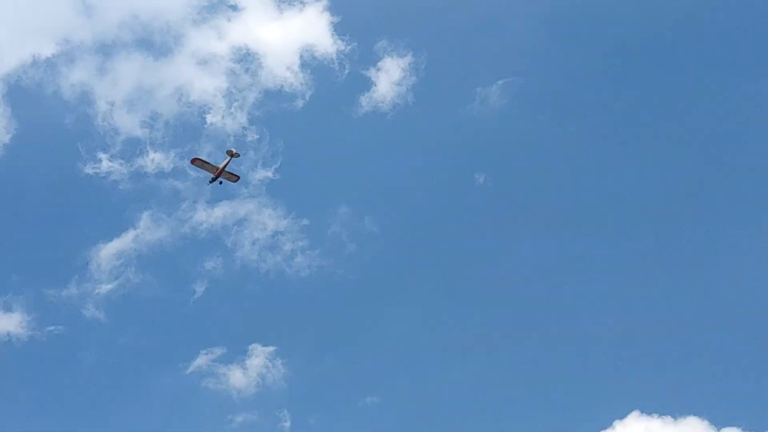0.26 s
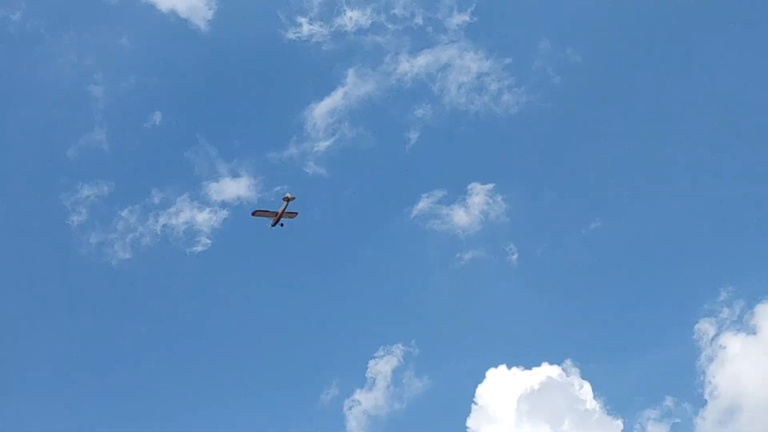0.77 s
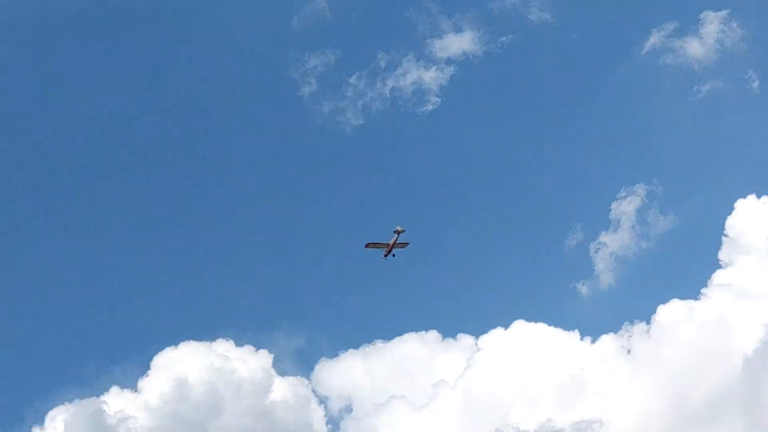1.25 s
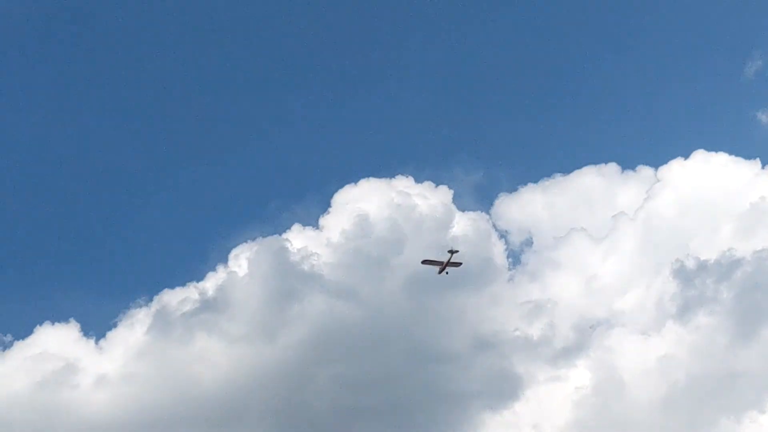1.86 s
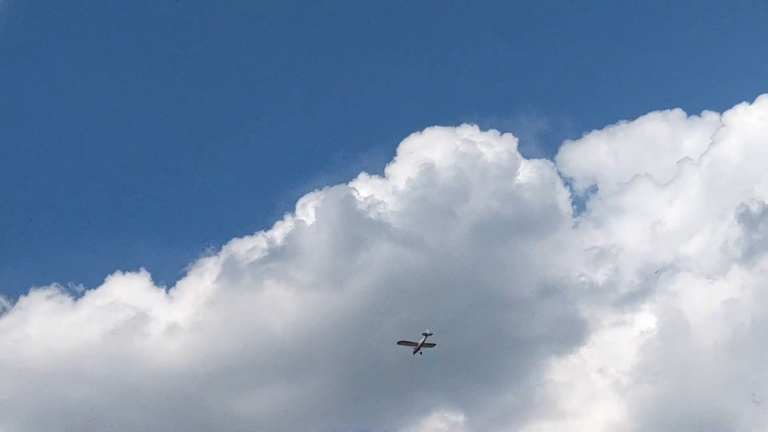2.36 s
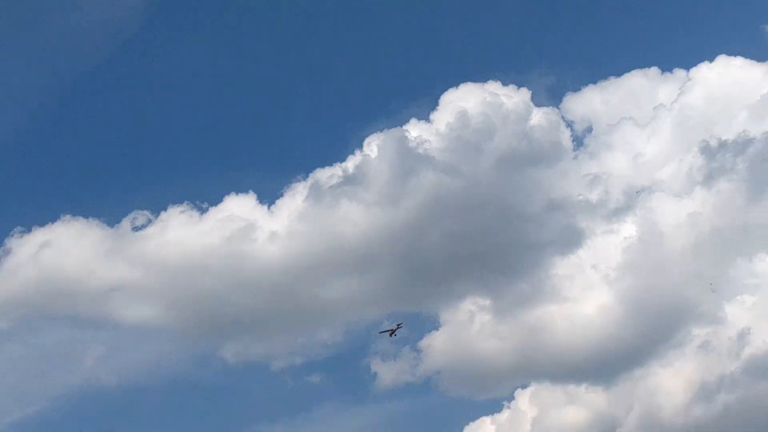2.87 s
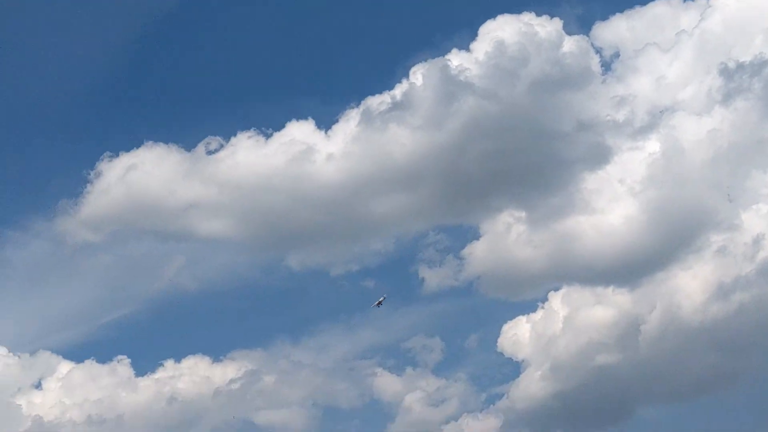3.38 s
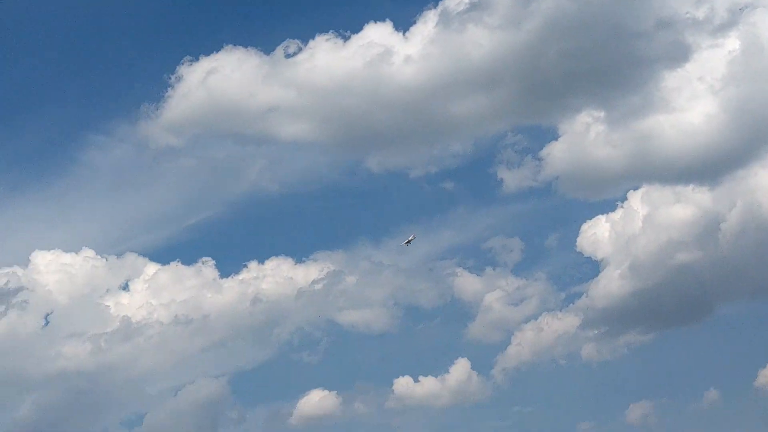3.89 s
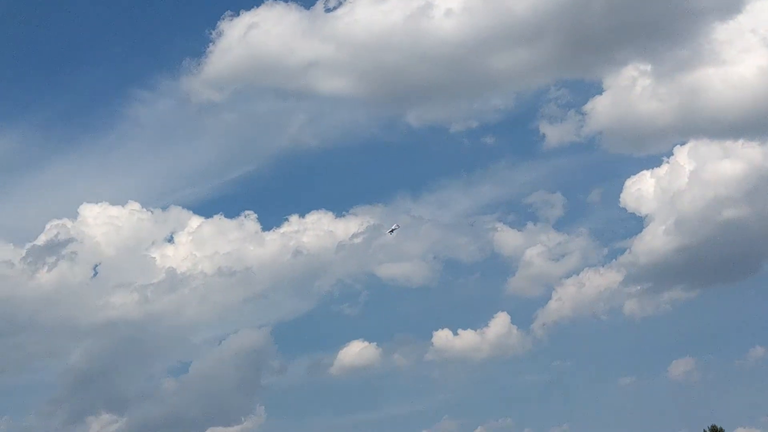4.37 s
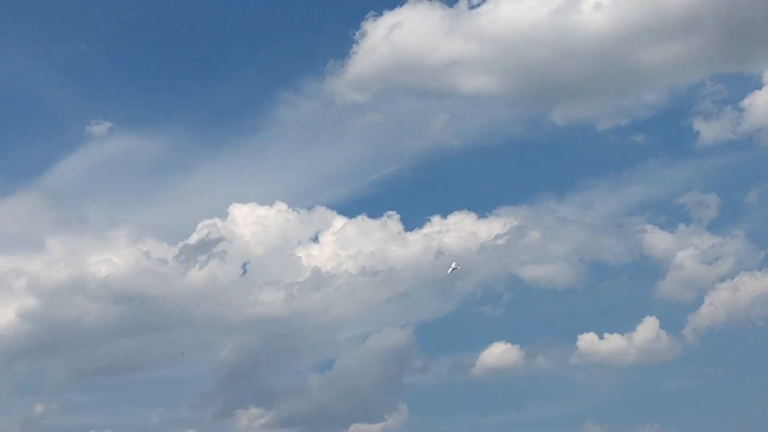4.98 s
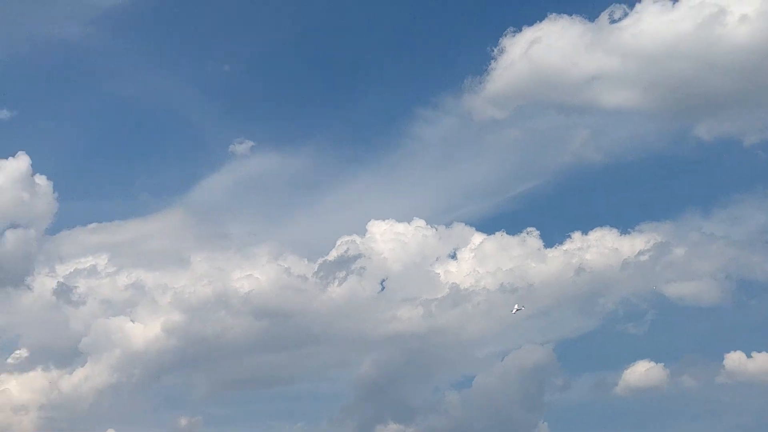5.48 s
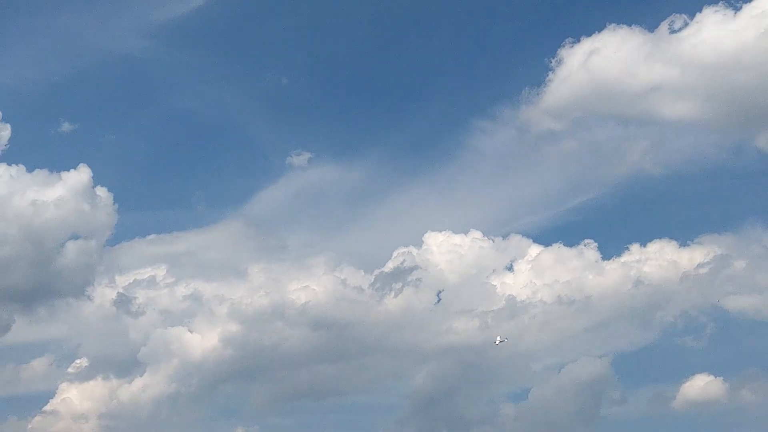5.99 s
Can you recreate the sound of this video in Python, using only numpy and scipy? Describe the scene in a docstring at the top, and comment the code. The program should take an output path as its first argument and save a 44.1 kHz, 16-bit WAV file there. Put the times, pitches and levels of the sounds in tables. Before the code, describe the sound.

The raspy, uneven buzz of a model plane's engine recedes and then speeds up, amid wind gusts and light handling knocks.

```python
"""A small two-stroke model aeroplane idles past overhead, firing once every one to five turns of the shaft,
then opens up as it turns away. Each pop rings the exhaust pipe and silencer and comes again off the ground,
over the propeller's whine and rush. Gusts buffet and thump the hand-held microphone; fingers rustle, tick and
knock on it. Behind, the open air murmurs, a far machine hums, a thin hiss swells and a whistle falls."""
import sys
import numpy as np
from scipy import signal
from scipy.io import wavfile
from scipy.ndimage import uniform_filter1d

SR = 44100
rng = np.random.default_rng(int(sys.argv[2]) if len(sys.argv) > 2 else 0)


def dump(signal):
    """Clip the signal to [-1, 1] and save it as 16-bit WAV at the path in sys.argv[1]."""
    limited = np.clip(np.atleast_2d(signal).T, -1, 1)
    pcm = np.round(limited * 32767).astype(np.int16)
    wavfile.write(sys.argv[1], SR, pcm)


N = 275169
TIME = np.arange(N) / SR

# The engine shaft's progress. Each row: time in seconds, turns made so far.
SHAFT = [(-0.0047, 0), (.2862, 21), (.5132, 37), (.6725, 48), (.8859, 63), (1.1864, 84), (1.4546, 103),
         (1.6857, 119), (1.8703, 132), (2.0571, 145), (2.1882, 154), (2.404, 169), (2.682, 188),
         (2.8528, 200), (2.9548, 207), (3.0877, 216), (3.31, 231), (3.5442, 247), (3.6346, 253),
         (3.7213, 259), (4.0177, 280), (4.1042, 286), (4.2667, 297), (4.4517, 310), (4.6022, 321),
         (4.6808, 327), (4.7562, 333), (4.8527, 341), (4.9233, 347), (5.038, 357), (5.1726, 369),
         (5.3032, 381), (5.4339, 393), (5.541, 403), (5.6695, 415), (5.7945, 427), (5.8777, 435),
         (6.2393, 470)]


def undb(db):
    """Decibels to gain."""
    return 10 ** (np.asarray(db) / 20)


def level(x, db):
    """Scale to an rms level."""
    return x * undb(db) / np.sqrt(np.mean(x ** 2))


def curves(table):
    """Columns of a timed table as curves, sample by sample."""
    s, *columns = np.transpose(table)
    return [np.interp(TIME, s, c) for c in columns]


def butter(order, hz, kind="low"):
    """Sections of a Butterworth filter."""
    return signal.butter(order, hz, kind, fs=SR, output="sos")


def band(x, hz, width_hz):
    """Resonance with gain 1 at the centre."""
    return signal.lfilter(*signal.iirpeak(hz, hz / width_hz, fs=SR), x)


def body(x, modes, flip=False):
    """Steep resonances (Hz, width in Hz, dB); flipping every other one leaves no hole between them."""
    return sum((-1) ** (k * flip) * undb(db) * band(band(x, hz, width), hz, width)
               for k, (hz, width, db) in enumerate(modes))


def clicks(s, size):
    """Impulses, each shared between two samples."""
    out, place = np.zeros(N + 1), np.asarray(s) * SR
    inside = (place >= 0) & (place < N - 1)
    whole, size = place[inside].astype(int), size[inside]
    np.add.at(out, whole, size * (whole + 1 - place[inside]))
    np.add.at(out, whole + 1, size * (place[inside] - whole))
    return out[:N]


def delay(x, ms):
    """Delay by a steady or moving time."""
    return np.interp(np.arange(N) - ms * SR / 1000, np.arange(N), x, left=0)


def fade(x, ms):
    """Every impulse becomes a decaying envelope."""
    return signal.lfilter([1], [1, -np.exp(-1000 / (ms * SR))], x)


def walk(rate):
    """Random levels held 1 / rate seconds and smoothed twice."""
    k = int(SR / rate)
    held = np.repeat(rng.standard_normal(N // k + 1), k)
    return 2.16 * uniform_filter1d(uniform_filter1d(held, k), k)[:N]


def swell(s, length_s):
    """Bell-shaped envelope that peaks at s."""
    return np.exp(-(2 * (TIME - s) / length_s) ** 2)


def open_air():
    """Outdoor murmur: half-octave bands of noise, each wavering on its own."""
    # The murmur's colour. Each row: frequency in Hz, relative level in dB.
    spectrum = [(60, -2), (100, -9), (160, -30), (250, -22), (400, -34.5), (1000, -5.5), (2000, 9),
                (3200, -42), (5000, -55.5), (8000, -71.5), (16000, -76.5)]
    hz, db = np.transpose(spectrum)
    air = 0
    for centre in 70 * 2 ** np.arange(0, 7, .5):
        mode = [(centre, centre / 2, 0)]
        band_db = np.interp(np.log(centre), np.log(hz), db) + walk(17)
        air = air + body(undb(band_db) * body(rng.standard_normal(N), mode), mode)
    return level(air, -52)


def far_machine(pitches_hz=(87.5, 117)):
    """A distant hum: two low tones that waver in level and pitch."""
    # The hum's course. Each row: time in seconds, lower tone in dB, upper tone in dB.
    levels = [(0, -56, -56), (2.5, -51, -55.5), (3.3, -46, -53), (3.7, -44, -59), (4.05, -40.5, -55.5),
              (4.4, -50, -58), (4.7, -52, -50), (5.1, -59, -56), (5.601, -50, -49.5), (6.24, -45, -53)]
    hum = 0
    for hz, db in zip(pitches_hz, curves(levels)):
        gain = np.sqrt(2) * undb(db + 1.2 * walk(7.3))
        pitch = hz * (1 + 0.0036 * walk(3.46))
        hum = hum + gain * np.sin(np.cumsum(2 * np.pi * pitch / SR))
    return hum


def treble_hiss():
    """A narrow hiss, unrelated left and right, swells and sinks."""
    # Swells of hiss. Each row: peak time in seconds, length in seconds, level in dB.
    swells = [(.9, 0.35, -70), (1.4, 0.45, -66.5), (3.5, .1, -61), (3.757, 0.07, -62), (3.93, 0.13, -66),
              (4.25, .25, -86), (4.78, .14, -82), (5.12, 0.22, -70.5)]
    # The hiss band: centre in Hz, width in Hz, gain in dB.
    tone = [(8230, 1400, 0)]
    gain = sum(undb(db) * swell(s, length_s) for s, length_s, db in swells)
    return gain * level(body(rng.standard_normal((2, N)), tone), 0)


def whistle():
    """One faint, falling, fluttering tone, perhaps a far bird."""
    # The glide. Each row: time in seconds, pitch in Hz, level in dB.
    glide = [(5.2, 3660, -95), (5.25, 3620, -70), (5.32, 3550, -63), (5.41, 3340, -77), (5.43, 3320, -95)]
    hz, db = curves(glide)
    gain = undb(db + 4 * walk(110))
    pitch = hz * (1 + .008 * walk(90))
    return gain * np.sin(np.cumsum(2 * np.pi * pitch / SR))


def wind(lulls_per_s=7.5):
    """Eddies at the microphone port: lumpy low noise, the same in both channels."""
    # The breeze between gusts. Each row: time in seconds, buffet and rumble in relative dB.
    breeze = [(0, -38, -57), (.45, -30.5, -34), (1.3, -22, -41), (1.5, -35.5, -59), (1.9, -33.5, -47),
              (2.3, -32.5, -41.5), (2.6, -33.5, -50.5), (3.5, -33, -51.5), (4.2, -36.5, -53.5),
              (4.7, -46.5, -60), (5.2, -50, -58), (5.7, -53.5, -56), (6.24, -34.5, -60)]
    # Gusts. Each row: peak time and length in seconds, buffet and rumble in relative dB.
    gusts = [(0, 0.052, -27, -38), (0.125, 0.11, -24, -39), (0.426, 0.083, -26, -49),
             (0.673, 0.05, -15.5, -43), (0.782, 0.099, -23.5, -59), (0.942, 0.095, -18.5, -39),
             (1.183, 0.13, -24, -47), (1.36, 0.07, -13.5, -37), (1.444, 0.17, -53, -36.5),
             (1.633, 0.099, -36, -38), (2.113, 0.37, -37.5, -49), (2.266, 0.045, -43, -51),
             (3.01, 0.076, -54, -47), (3.142, 0.045, -41, -57), (4.013, 0.016, -21.5, -54),
             (4.453, 0.32, -36.5, -49), (5.032, 0.14, -65, -43), (5.28, 0.16, -43, -54),
             (5.71, 0.022, -45, -55)]
    buffet_gain, rumble_gain = [undb(db + walk(lulls_per_s)) for db in curves(breeze)]
    for s, length_s, buffet_db, rumble_db in gusts:
        buffet_gain += undb(buffet_db) * swell(s, length_s)
        rumble_gain += undb(rumble_db) * swell(s, length_s)
    eddies = undb(0.97 * walk(50)) * rng.standard_normal(N)
    buffet = body(eddies, [(235, 78, 4), (268, 250, 7.5), (460, 240, -7)])
    buffet = signal.sosfilt(butter(5, [185, 1500], "band"), buffet)  # the wind filter cuts the lows
    slow_eddies = undb(0.18 * walk(4.5)) * rng.standard_normal(N)
    rumble = body(slow_eddies, [(75, 112, 28.5), (105, 97, -4)])
    return buffet_gain * level(buffet, -7) + rumble_gain * level(rumble, 0.13)


def strokes(table, touch_s=0.01, lift_ms=17):
    """Left and right gain of rubbing: touch, hold, lift."""
    held = np.zeros((2, N))
    for s, length_s, db, pan_db in table:
        held[:, int(s * SR):int((s + length_s) * SR)] += undb([[db + pan_db / 2], [db - pan_db / 2]])
    touched = uniform_filter1d(held, int(touch_s * SR))
    return fade(touched, lift_ms) * 1000 / (lift_ms * SR)


def rustle(grip_db=-77.5):
    """Skin rubs the casing in grainy strokes and rough scrapes; even the resting grip whispers."""
    # Light strokes. Each row: start and length in seconds, level in dB, left minus right in dB.
    rubs = [(0.588, 0.064, -62, -8), (0.698, 0.027, -58, 4), (.76, 0.14, -60, -4), (.92, 0.11, -62, -3),
            (1.06, 0.23, -66, -12), (1.298, 0.11, -58, 5), (1.45, 0.16, -64.5, 15),
            (1.628, 0.08, -57.5, -6), (1.735, 0.059, -61, -5), (3.33, 0.037, -65, -9),
            (3.455, 0.055, -61, -14), (3.72, 0.062, -65, -18), (3.997, 0.032, -52, 5),
            (4.519, 0.043, -72, 5), (5.52, .1, -86, -6)]
    # Their bright colour. Each row: centre in Hz, width in Hz, gain in dB.
    rub_tone = [(2980, 320, -16.5), (5050, 6500, -0.5), (8040, 1600, -0.5), (12000, 22000, -7)]
    # Scrapes along the grip. Each row: start and length in seconds, level in dB, left minus right in dB.
    scrapes = [(.6, 0.059, -47, 4), (1.5, 0.1, -48, 0), (3.44, 0.054, -54, -2), (4.0, 0.025, -38.5, 0)]
    # Their lower colour. Each row: centre in Hz, width in Hz, gain in dB.
    scrape_tone = [(2900, 1100, -3), (4300, 260, -18)]
    grain = undb(2 * walk(150) + walk(25))
    rub = level(body(grain * rng.standard_normal((2, N)), rub_tone), 0.44)
    scrape = level(body(grain * rng.standard_normal(N), scrape_tone), 0)
    return rub * (strokes(rubs) + undb(grip_db)) + scrape * strokes(scrapes)


def ticks():
    """Fingers tick on the casing: tiny bursts of bright noise."""
    # Lone ticks. Each row: time in seconds, relative peak in dB, left minus right in dB.
    touches = [(0.7051, -34, 22), (0.8014, -32, 7), (1.1187, -43, 18), (1.1683, -33, -12),
               (1.2842, -32, 11), (1.3406, -34, 17), (1.365, -34, 21), (1.667, -36.5, 37),
               (1.6824, -38, -0.5), (1.71, -35, -3), (1.748, -32, 3), (3.2027, -33, -10),
               (3.2452, -23.5, -2), (3.7, -47, 4), (3.816, -46, 0), (3.9841, -41, 7), (4.009, -38, 10),
               (4.029, -23, 9), (4.041, -25.5, 15), (4.5625, -34, 4), (4.9134, -30, 6), (5.2884, -43, 9),
               (6.125, -43, 15)]
    s, db, pan_db = np.transpose(touches)
    snaps = np.array([clicks(s + 0.00088, undb(db + side * pan_db / 2)) for side in (1, -1)])
    bursts = fade(snaps, ms=0.075) * rng.standard_normal((2, N))
    return undb(8) * body(bursts, [(7160, 5700, 0.023)])


def thumps_and_knocks():
    """Wind thumps and handling knocks on the microphone: short damped rings with a bright edge."""
    # Hits. Each row: time in seconds, relative peak in dB, pitch in Hz, ring time in ms, pressure sign.
    hits = [(0.1055, -9, 565, 37, 1), (0.676, -13, 390, 28, 1), (0.759, -10, 451, 69, 1),
            (0.943, -10, 324, 21, 1), (1.168, -11, 452, 7, 1), (1.313, -5.5, 553, 6.6, 1),
            (1.3422, -4.5, 645, 7.4, 1), (1.35, -8.5, 403, 27, -1), (1.3646, -0.5, 577, 16, 1),
            (1.385, -24, 360, 35, 1), (1.7115, 0, 600, 3.3, -1), (3.205, 0, 538, 5.5, 1),
            (3.2468, -10.5, 620, 1.4, 1), (3.985, -14, 634, 3.1, 1), (4.0288, -1.5, 855, 7.3, -1),
            (4.0298, -8, 594, 19, 1), (4.043, -11.5, 520, 4.6, -1), (4.435, -21, 346, 24, 1),
            (5.247, -46, 4420, 12, 1), (5.289, -42, 4100, 15, 1)]
    # The bright edge: centre in Hz, width in Hz, gain in dB.
    edge_tone = [(1900, 1210, 12.5)]
    rings, t = np.zeros(N), np.arange(SR // 20) / SR
    for s, db, hz, ms, sign in hits:
        ring = np.sin(2 * np.pi * hz * t) * np.exp(-np.log(1000) * t * 1000 / ms)
        at = int((s - 1 / (4 * hz)) * SR)  # the ring swells over a quarter cycle
        rings[at:at + len(t)] += sign * undb(db) * ring / ring.max()
    s, db = np.transpose(hits)[:2]
    edges = body(clicks(s, undb(db)), edge_tone)
    return signal.sosfiltfilt(butter(2, [210, 5200], "band"), rings + edges)


def shaft():
    """Turns made and turns per second; the propeller is a flywheel, so the speed changes smoothly."""
    rough_turns = curves(SHAFT)[0]
    step = uniform_filter1d(np.gradient(rough_turns), size=SR // 9)
    return rough_turns[0] + np.cumsum(step), step * SR


def engine_pulses(turns, opens_s=4.35, idle_turns=3, open_turns=2):
    """Some turns fire with a pop, the others only puff; the blades beat once a turn."""
    # Stumbles in the rhythm. Each row: first firing in seconds, turns between firings, times over.
    stumbles = [(.079, 2, 3), (.371, 2, 2), (.513, 5, 1), (.585, 2, 3), (.886, 4, 1), (1.072, 2, 2),
                (1.129, 4, 1), (1.272, 2, 2), (1.541, 4, 1), (1.686, 4, 1), (1.742, 2, 1), (1.813, 4, 1),
                (1.999, 4, 1), (2.231, 2, 1), (2.346, 2, 2), (2.624, 4, 1), (2.853, 4, 1), (3.442, 4, 1),
                (3.806, 2, 1), (3.961, 4, 1), (4.148, 2, 1), (4.41, 3, 1), (4.561, 3, 1), (5.815, 1, 1),
                (5.846, 1, 1), (6.003, 1, 4), (6.086, 1, 1), (6.219, 1, 1)]
    # Weak firings. Each row: time in seconds, level against the others in dB.
    weak_firings = [(.399, -6), (.643, -29), (1.1, -11), (1.3, -3), (1.497, -5.5), (2.26, -4.5),
                    (2.448, -5.5), (2.492, 0), (2.536, -1.5), (2.913, -4), (3.544, -4), (3.806, -3),
                    (4.148, -8)]
    mark_s, marks = np.transpose(SHAFT)
    turn = np.arange(int(marks[-1]))
    turn_s = np.interp(turn, turns, TIME, left=-1, right=-1)
    nearest = lambda s: int(round(np.interp(s, mark_s, marks)))
    late_s = lambda lag_turns: np.interp(turn + lag_turns, turns, TIME, right=-1)
    wait = np.where(turn_s < opens_s, idle_turns, open_turns)
    for s, waited, times in stumbles:
        wait[nearest(s):nearest(s) + waited * times] = waited
    fired, k = np.zeros(len(turn), bool), 0
    while k < len(turn):
        fired[k] = True
        k += wait[k]
    weak_db = np.zeros(len(turn))
    for s, db in weak_firings:
        weak_db[nearest(s) - 1:nearest(s) + 2] = db
    pop_luck, puff_luck, beat_luck = rng.standard_normal((len(turn), 3)).T
    scatter_db = .3 * (wait - 1) * pop_luck  # sparser firings are more uneven
    pops = clicks(turn_s, fired * undb(weak_db + scatter_db))
    puffs = clicks(late_s(0.083), ~fired * undb(1.6 * puff_luck))  # unfired gas leaves the port later
    puffs *= undb(-15.5 + 2.5 * (TIME > opens_s))  # a little stronger at open throttle
    beats = clicks(late_s(1.3), undb(2 * beat_luck))
    return pops, puffs, beats


def exhaust_pipe(pulses, thin, ring_db, blast_ms, lean_share=0.35):
    """Each blast, a push then a pull, rings the pipe; from aside it thins to a push between two pulls."""
    # Upper pipe rings. Each row: centre in Hz, width in Hz, gain in dB.
    upper_rings = [(640, 480, -18.5), (1103, 184, -4)]
    # The lowest pipe ring: centre in Hz, width in Hz, gain in dB.
    low_ring = [(353, 61, 0.5)]
    t = np.arange(-4, 6, 1000 / (blast_ms * SR))
    full_shape = (1 - t) * np.exp((1 - (t - 1) ** 2) / 2)
    lean_shape = 1.31 * np.cos(2.31 * t) * np.exp(-((t - .55) / 1.32) ** 2)
    full, lean = (np.convolve(pulses, shape)[np.sum(t < 0):][:N] for shape in (full_shape, lean_shape))
    blast = (1 - lean_share * thin) * full + lean_share * thin * lean
    return undb(-0.28) * blast + body(blast, upper_rings) + body(undb(ring_db) * blast, low_ring)


def silencer(strikes, beats, thin, crack_db, gas_db, blast_ms):
    """The port snaps shut at the blast's pull and hot gas hisses; both ring silencer and tail pipe."""
    # Silencer rings. Each row, here and in the next four tables: centre in Hz, width in Hz, gain in dB.
    rings = [(1683, 593, 16.5), (2182, 145, 11.5), (2580, 78, -4)]
    # Silencer rings heard from aside.
    rasp = [(2415, 370, 15.5), (1140, 300, 9.5)]
    # Tail-pipe rings, beamed backwards.
    snap = [(3916, 366, 0), (6980, 1300, -20), (9000, 930, -21.5)]
    # A higher tail-pipe ring.
    upper_snap = [(4300, 150, -3.5)]
    # The crack's broad, dry edge.
    edge = [(2830, 1570, -2)]
    # The tail pipe's aim at the microphone. Each row: time in seconds, snap, upper snap and edge in dB.
    beam = [(0, -1, 4.5, 3.5), (.55, 3, 0, 1.5), (1.0, -1, -10, 4.5), (2.5, 1, -21, -17),
            (3.4, -5.5, -20, -11), (3.899, -14, -15, -16), (4.2, -5, -18, -11), (4.4, -0.5, -4, 0),
            (4.75, 8, -2, 4), (4.95, -9, -16, -6), (5.45, -27, -17, -24), (5.55, -7, 2, -6),
            (5.8, -16, -10, -26), (6.02, -14, -8, -8.5), (6.24, -17, 3, -12)]
    lingering = (0.014 + 0.061 * thin) * fade(strikes + beats, ms=25.5)  # fuller from aside
    gas = undb(gas_db) * (fade(strikes, ms=1.64) + lingering) * rng.standard_normal(N)
    shock = undb(crack_db) * (gas - delay(strikes, 1.096 * blast_ms))
    crack = body(shock, rings, flip=True) + thin * body(shock, rasp)
    tail = sum(undb(db) * body(shock, modes) for db, modes in zip(curves(beam), (snap, upper_snap, edge)))
    return signal.sosfiltfilt(butter(3, 3100), crack) + tail


def slipstream():
    """The fluttering rush of air behind the propeller."""
    # The rush's colour. Each row: centre in Hz, width in Hz, gain in dB.
    tone = [(439, 297, 11), (900, 260, 2), (1700, 367, -6), (3970, 190, -31.5)]
    eddies = undb(0.84 * walk(70)) * rng.standard_normal(N)
    return signal.sosfilt(butter(3, 5000), level(body(eddies, tone), 0))


def blade_whine(turns):
    """Fluttering propeller tones, locked to the shaft."""
    # Blade tones. Each row: multiple of the shaft speed, level against the blade beat in dB.
    tones = [(3, -3), (4, -17), (5, -6.5), (6, -8.5), (8, -3.5), (12, -8.5), (13, -13)]
    return sum(undb(db + 2.5 * walk(25)) * np.sin(2 * np.pi * k * turns) for k, db in tones)


def flight_path(motor, stream, thin):
    """The sound arrives directly and off the ground; eddies make it waver and the air dulls it."""
    # The ground echo. Each row: time in seconds, lag in ms.
    ground = [(0, 7.7), (.9, 6.55), (1.6, 5.4), (2.0, 4.9), (2.8, 3.97), (3.3, 3.55), (3.7, 3.25),
              (4.2, 2.8), (4.75, 2.59), (5.2, 2.5), (5.6, 2.4), (5.85, 2.47), (6.24, 2.44)]
    lag_ms = curves(ground)[0]
    direct = motor + stream
    echo_db = -2 - 1.15 * lag_ms  # a flatter path reflects sooner and better
    heard = direct + undb(echo_db) * band(delay(direct, lag_ms), 290, 3800)
    heard += 0.33 * delay(stream, lag_ms)  # the low rush reflects more fully than the pops
    heard = delay(heard, ms=.16 * thin * (3 + walk(17))) * undb(1.05 * thin * walk(10))
    heard -= 0.26 * band(heard, 1470, 910)  # a steady dip near 1.5 kHz
    # the microphone's wind filter cuts the aeroplane's bass
    heard = signal.sosfiltfilt(butter(2, 206, "high"), heard)
    return signal.sosfilt(butter(2, 7200), heard)


def aeroplane(blast_ms=0.33):
    """The two-stroke flies past: its pulses drive pipe and silencer while the propeller whines."""
    # The fly-by. Each row: time in seconds; overall level, lowest ring, crack and gas hiss in
    # relative dB; thinness of the blast from 0 to 1.
    flight = [(0, -9, 1, 3, -15.5, 0.17), (.35, -8.5, -1, -2, -8.5, 0.52), (.7, -11, -2, 3, -14, 0.06),
              (1.0, -11, -3.5, 0.5, -12.5, 0), (1.4, -10, -2.5, 2, -12.5, 0),
              (1.8, -10.5, -3.5, 1.5, -15, 0.13), (2.2, -12, -17, 1.5, -11, 0.17),
              (2.6, -13, -10.5, 5, -16.5, 0.1), (3.0, -12.5, -4, 6, -11.5, 0.01),
              (3.45, -15.5, -2, 7, -16.5, 0), (3.9, -15, 4.5, 5.5, -18, 0.06),
              (4.25, -20.5, -2.5, -12.5, 4.5, 0.13), (4.45, -18.5, 4, -11.5, 4, 0.07),
              (4.9, -18.5, -21, -4, -26.5, 0.64), (5.2, -18, -24, -3.5, -27, 1),
              (5.4, -18.5, -13, -6, -15.5, 0.6), (5.55, -14.5, -12, -4, -15.5, 0.97),
              (5.8, -18, -7.5, -5.5, -17, 0.59), (6.02, -18.5, -19.5, -1.5, -11.5, 0.5),
              (6.24, -18, -5, -6, -11.5, 0.42)]
    # The blade beat. Each row: shaft turns per second, level against a firing in dB.
    blade_levels = [(70, -45), (76, -20), (92, -17.5), (97, -21)]
    near_db, ring_db, crack_db, gas_db, thin = curves(flight)
    near = undb(near_db)
    turns, speed = shaft()
    blade_gain = undb(np.interp(speed, *np.transpose(blade_levels)))
    pops, puffs, beats = near * np.array(engine_pulses(turns))
    beats *= blade_gain
    motor = exhaust_pipe(pops + puffs + beats, thin, ring_db, blast_ms)
    motor += silencer(pops + 0.14 * puffs, beats, thin, crack_db, gas_db, blast_ms)
    stream = near * undb(-22.5 - 10.5 * thin) * slipstream()  # fainter from aside
    whine = blade_gain * blade_whine(turns)
    # the fifth multiple of the shaft speed keeps the lowest ring humming
    drone = undb(-20 + ring_db + 1.4 * walk(15)) * np.sin(2 * np.pi * 5 * (turns - 0.072))
    motor += near * (whine + drone)
    motor += undb(-12.5) * delay(motor, ms=2.115)  # the pipe repeats each pulse
    return flight_path(motor, stream, thin)


def scene():
    """The aeroplane, a little to the left, among wind, handling noise and the outdoor background."""
    plane = aeroplane() * undb([[2.5], [-2.5]])
    return (plane + wind() + thumps_and_knocks() + open_air() + far_machine()
            + rustle() + ticks() + treble_hiss() + whistle())


def record(dry, mono_below_hz=5200, top_hz=16400):
    """Below the treble both channels carry the same sound; the top is cut steeply."""
    side = (dry[0] - dry[1]) / 2
    low_side = side - signal.sosfiltfilt(butter(6, mono_below_hz, "high"), side)
    narrow = dry - np.array([low_side, -low_side])
    return signal.sosfilt(signal.ellip(10, .2, 70, top_hz, fs=SR, output="sos"), narrow)


dry = scene()
out = record(dry)
dump(out)
```